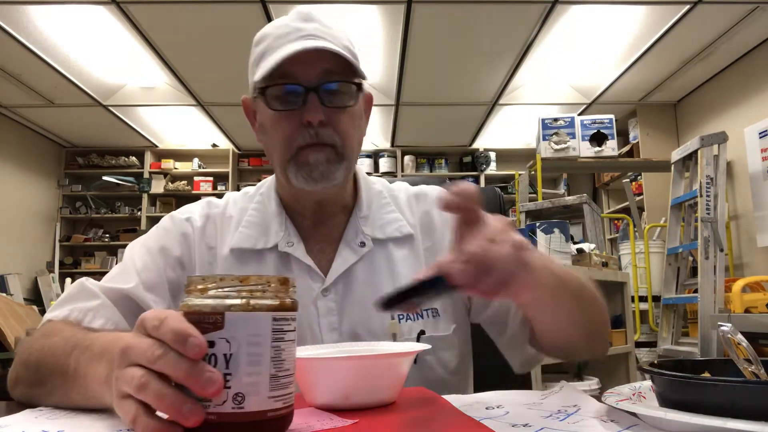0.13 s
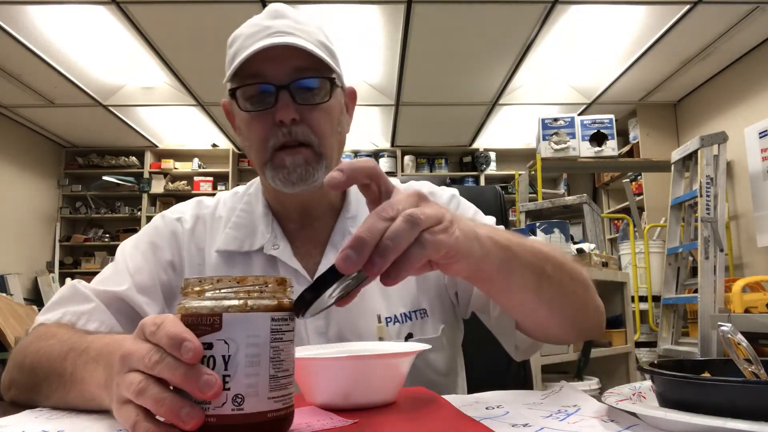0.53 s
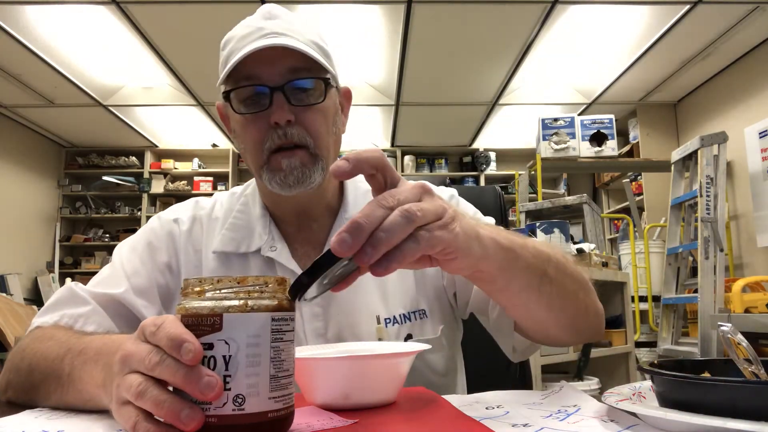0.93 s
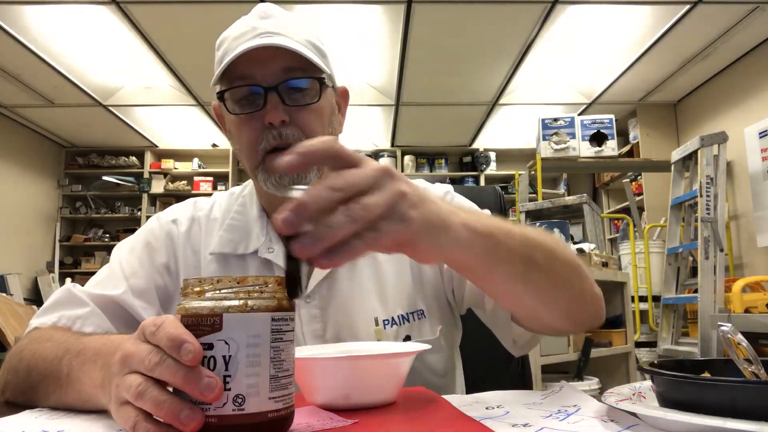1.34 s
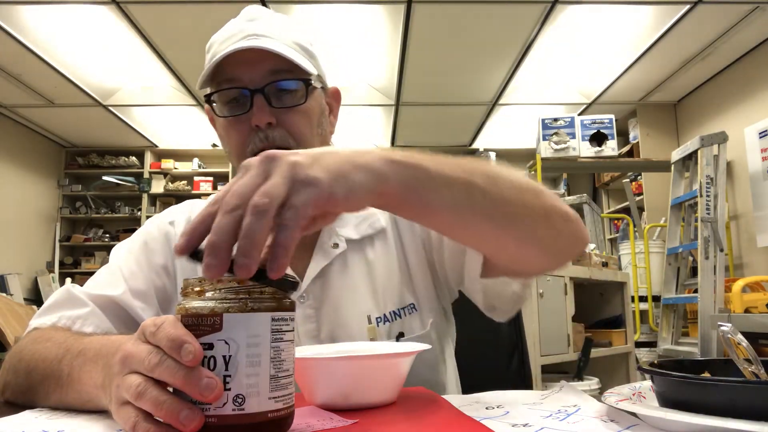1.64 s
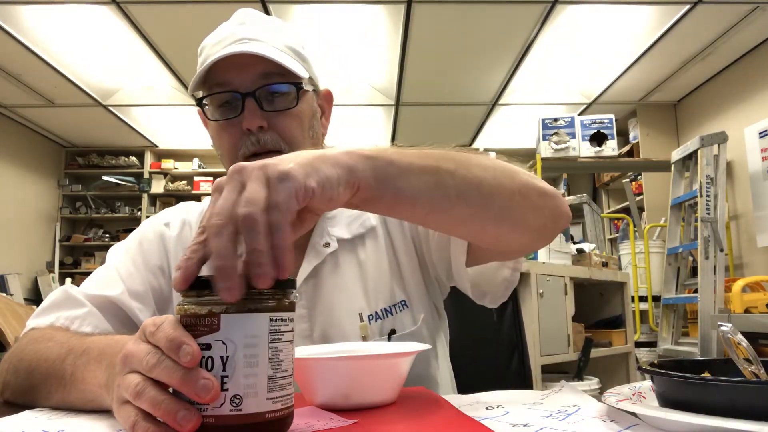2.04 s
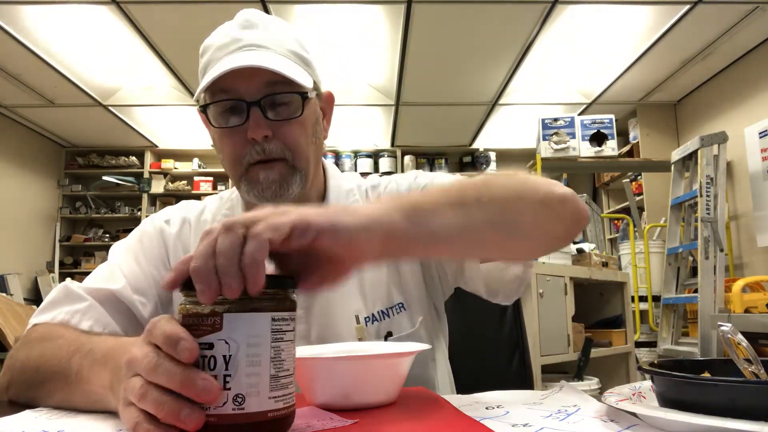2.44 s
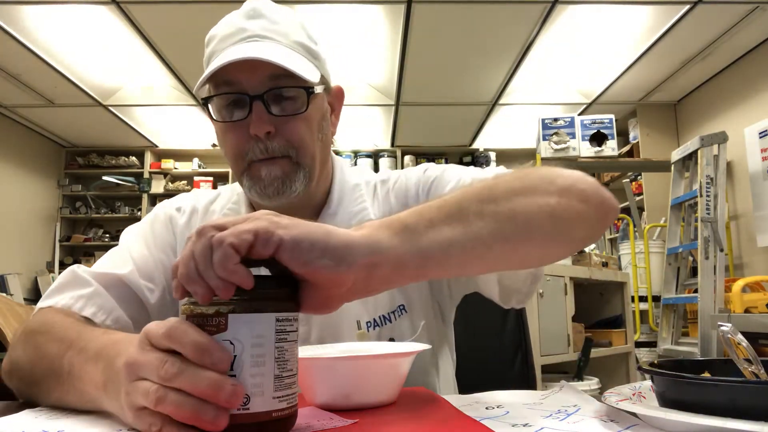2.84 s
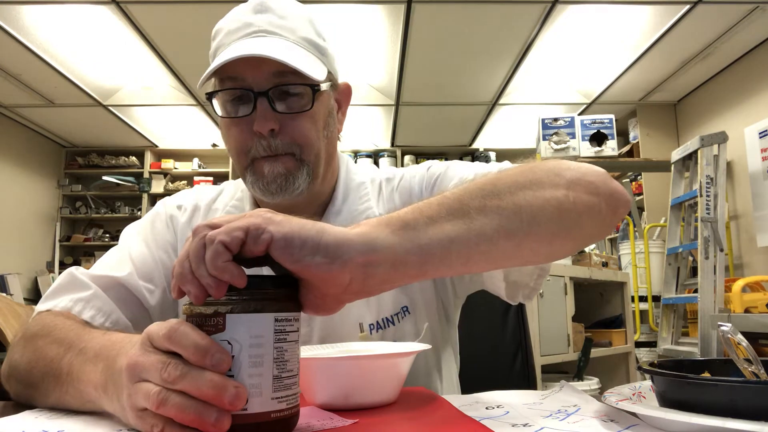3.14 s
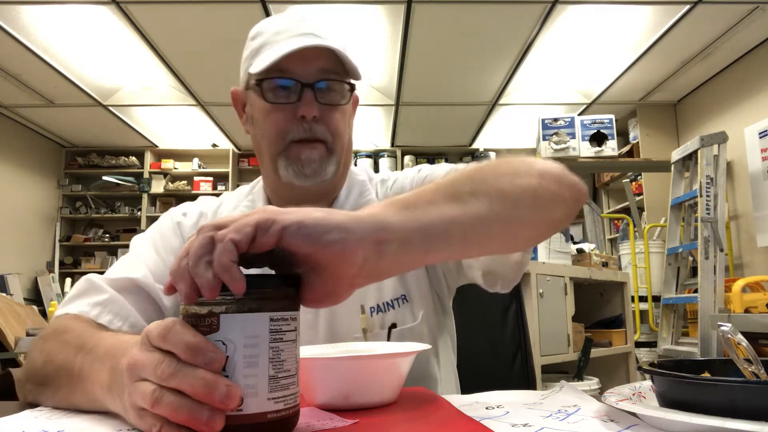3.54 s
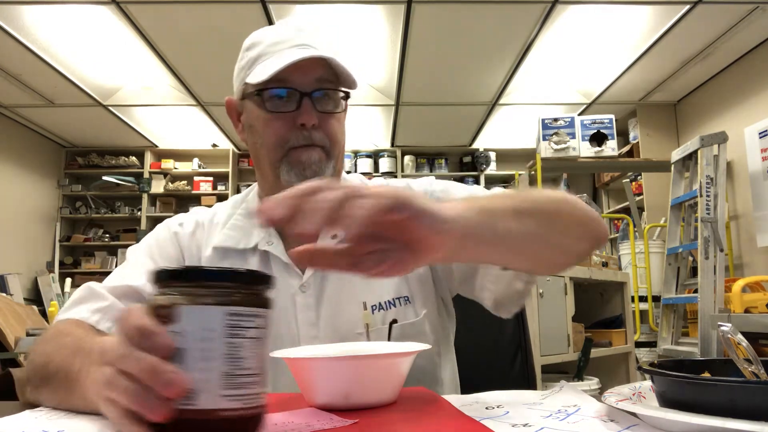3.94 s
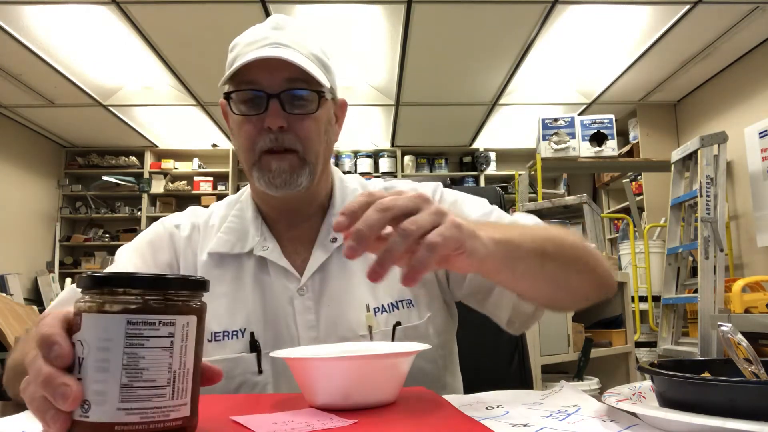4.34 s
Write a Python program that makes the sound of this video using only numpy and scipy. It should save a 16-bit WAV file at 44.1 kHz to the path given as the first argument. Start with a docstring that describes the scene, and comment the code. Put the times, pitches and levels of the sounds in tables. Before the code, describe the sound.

A metal screw lid taps twice against the rim of a glass jar, then rattles over its mouth and seats with a louder clack. Hands rub faintly as they turn the lid. The jar slides briefly across the table and the grip gives a sharp little click. It is all heard close up in a small, fairly dry room with a low ventilation rumble.

```python
"""A metal screw lid goes back on a glass jar, close by on a workshop table. Its rim taps the glass,
rattles over the mouth and clacks home: each contact cracks and rings lid, jar and the air between
them, which sounds lower as the gap closes. Hands tick and rub, turn the lid and slide the jar aside.
Ventilation rumbles and whines faintly in a small, fairly dry room."""
import sys
import numpy as np
from scipy import signal
from scipy.fft import rfft, irfft, next_fast_len
from scipy.io import wavfile
from scipy.ndimage import map_coordinates

SR = 44100
rng = np.random.default_rng(int(sys.argv[2]) if len(sys.argv) > 2 else 0)


def pcm_store(signal):
    """Save signal as 16-bit PCM."""
    levels = np.round(np.clip(np.atleast_2d(signal), -1, 1) * 32767)
    wavfile.write(sys.argv[1], SR, levels.astype(np.int16).T)


N = 198224
SCENE_T_S = np.arange(N) / SR
HIT_T_S = np.arange(SR // 3) / SR

# room decay: f/Hz, t60/s
ROOM_DECAY = [(150, 0.53), (600, 0.19), (2000, 0.27), (5000, 0.36), (9000, 0.27), (16000, 0.23)]
# background spectra: f/Hz, level/dB
DUCT_SPECTRUM = [(15, -85), (25, -104), (48, -9), (91, -10.5), (124, -3.5), (210, -8.5), (310, -18.5),
                 (425, -21), (509, -25), (574, -30.5), (730, -36.5), (900, -34), (1170, -82), (1980, -120)]
HISS_SPECTRUM = [(300, -25), (900, 7.5), (1400, 2), (2200, -2.5), (3000, -2), (4500, -2), (7500, -4.5),
                 (9000, -11), (16000, -12)]
# fan whine: f/Hz, width/Hz, level/dB, flutter/dB
WHINE_BANDS = [(3580, 87, -77.5, -1.5), (4197, 480, -74, 4.5)]

# skin, sleeve and thread strokes; rim grazes: t/s, length/s, level/dB
RUB_STROKES = [(-.05, 0.34, -65.5), (1.485, .11, -64.5), (2.425, 0.1, -69), (2.666, 0.28, -66.5),
               (3.516, 0.26, -67.5), (4.036, 0.23, -57.5), (4.197, 0.45, -64)]
RIM_GRAZES = [(1.465, 0.092, -60.5), (3.01, 0.12, -68.5)]
# friction spectra of strokes, jar on table, scraping base: f/Hz, level/dB
RUB_SPECTRUM = [(240, -33), (400, -26), (1040, -4), (1820, -1), (2120, -1), (4110, -1.5), (4650, -4),
                (12300, -14), (16000, -21)]
DRAG_SPECTRUM = [(250, 0.5), (400, -2), (520, -0.5), (660, 2), (780, -4.5), (950, -14.5), (1300, -11),
                 (3000, -18), (8000, -57)]
SCRAPE_SPECTRUM = [(700, -25), (1200, -39), (1800, -5.5), (2900, -0.5), (4200, -5), (5000, -6.5),
                   (7500, -11), (9000, -16), (16000, -23)]
# jar pushed, then lifted: t/s, speed/dB
SLIDE_SPEED = [(3.62, -17), (3.70, -12), (3.77, -4.5), (3.86, 0), (3.91, 4.5), (3.935, -9), (3.97, -14.5)]
# resonances under the sliding base: f/Hz, width/Hz
SCRAPE_BANDS = [(1500, 110), (2400, 140), (2760, 64), (3290, 100)]

# grip snaps: t/s, slip level/dB, f/Hz, slip count
GRIP_SNAPS = [(0.139, -49, 760, 1), (0.3348, -46, 6740, 1), (0.3642, -32, 4030, 3), (2.916, -54, 2530, 1),
              (3.655, -51, 2390, 1), (4.08, -54, 1860, 1), (4.234, -53.5, 2300, 1), (4.32, -50.5, 4400, 1),
              (4.378, -26.5, 4030, 4), (4.415, -48, 1430, 1)]
# slip noise: f/Hz, level/dB
FIZZ_SPECTRUM = [(300, -8), (1200, -11.5), (2000, -8), (2900, 5.5), (4200, -4), (5700, -3.5), (8000, 2.5),
                 (10500, -8), (13000, -8.5), (16000, -25)]
# ring and thud after a slip: f/Hz, level/dB, base t60/s
SNAP_MODES = [(3740, -27, 0.046), (4050, -3, 0.047), (8200, -13, 0.16)]
THUD_MODES = [(503, -4.5, 0.081), (1094, -7, 0.048), (1444, 5.5, 0.013)]

# rim on glass: t/s, strike/dB, favoured lid f/Hz, jar knock/dB, air/dB
RIM_CONTACTS = [(0.4303, -31, 2650, -37, -40.5), (0.8433, -25.5, 3400, -41, -50),
                (0.899, -53, 1700, -48.5, -71), (1.541, -44.5, 2720, -52, -47),
                (1.660, -44, 5000, -69, -42), (1.7342, -36.5, 4400, -46, -30),
                (1.7379, -32.5, 1970, -39, -24.5), (1.7534, -37.5, 2680, -37.5, -25.5),
                (1.7773, -44, 4100, -45.5, -43), (1.7992, -55, 1500, -51, -45.5),
                (1.8229, -39, 1610, -47, -42.5), (1.8481, -65, 1800, -37, -48.5),
                (1.8723, -51.5, 2220, -37, -43.5), (1.9096, -26.5, 5110, -59, -27.5),
                (1.9130, -31, 1750, -36, -22), (1.9465, -38.5, 3540, -23, -33.5),
                (1.9520, -24.5, 6300, -42, -35), (1.9585, -28, 4800, -21, -19),
                (1.9649, -20, 6360, -23.5, -27.5), (1.9672, -28, 1620, -49, -27.5),
                (2.079, -57.5, 1720, -44, -41), (2.134, -73, 1700, -47.5, -43.5),
                (2.165, -60.5, 2380, -66, -49), (2.916, -51, 800, -53, -41.5)]
# lid and standing jar: f/Hz, level/dB, base t60/s
LID_MODES = [(1493, -18.5, 0.1), (1649, 1, 0.062), (1820, -54, .045), (1850, -1.5, 0.03), (2237, -17, 0.13),
             (2445, -12.5, 0.098), (2850, -10, 0.027), (3158, -19.5, 0.14), (3710, -15, 0.086),
             (4620, -5, 0.079), (4647, -4.5, 0.04), (5070, -18, 0.1), (6066, -18, 0.089),
             (6450, -18, 0.048), (7860, -9, 0.054), (9980, -16, 0.068), (12800, -16, 0.08)]
JAR_MODES = [(325, -12, 0.078), (437, -8, 0.061), (501, 4, 0.036), (552, 0.5, 0.043), (618, -3, 0.073),
             (687, -10, 0.1), (877, -17, 0.092)]
# contact noise before tilt: f/Hz, level/dB
CRACK_SPECTRUM = [(200, 0), (850, -8), (1250, 4), (1700, 3), (3200, -6.5), (4100, -2.5), (4800, 1),
                  (6400, -1.5), (7700, -15), (9200, -27.5), (10500, -20), (15500, -19)]
# air resonance under the lid: t/s, f/Hz
GAP_PITCH = [(1.54, 955), (1.66, 1175), (1.734, 1040), (1.738, 942), (1.91, 890), (1.913, 570),
             (1.955, 640), (1.968, 480), (2.15, 585), (2.916, 311)]
# closing fingers damp the lid: t/s, t60 factor
GRIP_DAMPING = [(.43, 1.08), (.84, 0.79), (1.66, 0.43), (1.95, 0.43)]

RING_ATTACK_S, MID_HZ = 0.0007, 3000


def amp(db):
    """dB to gain."""
    return 10 ** (np.asarray(db) / 20)


def unit(x):
    """Scale to rms 1."""
    return x / np.sqrt(np.mean(x ** 2) + 1e-20)


def at_hz(points, hz):
    """Interpolate on a log frequency axis."""
    knots_hz, values = np.transpose(points)
    return np.interp(np.log(hz + 1), np.log(knots_hz + 1), values)


def peak(hz, centre_hz, width_hz):
    """Gain of one resonance."""
    return 1 / (1 + (2 * (hz - centre_hz) / width_hz) ** 2)


def filtered(x, response):
    """Apply a frequency response."""
    size = next_fast_len(len(x) + SR // 4)
    return irfft(rfft(x, size) * response(np.fft.rfftfreq(size, 1 / SR)), size)[:len(x)]


def noise(spectrum, size=N):
    """Coloured noise, rms 1."""
    return unit(filtered(rng.standard_normal(size), lambda hz: amp(at_hz(spectrum, hz))))


def noise_band(centre_hz, width_hz):
    """Noise through one resonance."""
    return filtered(rng.standard_normal(N), lambda hz: peak(hz, centre_hz, width_hz))


def wobble(rate_hz):
    """Smooth random curve."""
    return map_coordinates(rng.standard_normal(int(N * rate_hz / SR) + 4), [SCENE_T_S * rate_hz])


def fade(t60_s, attack_s):
    """Quick rise, exponential decay."""
    return np.exp(-np.log(1000) * HIT_T_S / t60_s) * (1 - np.exp(-HIT_T_S / attack_s))


def ping(hz, t60_s, attack_s=RING_ATTACK_S):
    """One damped mode."""
    return fade(t60_s, attack_s) * np.sin(2 * np.pi * hz * HIT_T_S)


def ring(modes, t60_factor, scatter_db, attack_s=RING_ATTACK_S):
    """Modes of alternating sign, levels scattered per hit."""
    return sum((-1) ** k * amp(db + scatter_db * rng.normal()) * ping(hz, t60_s * t60_factor, attack_s)
               for k, (hz, db, t60_s) in enumerate(modes))


def stroke_gain(strokes):
    """Each stroke speeds up, then slows to rest."""
    return sum(amp(db) * np.interp((SCENE_T_S - start_s) / length_s, [0, 0.35, 1], [0, 1, 0])
               for start_s, length_s, db in strokes)


def add(track, t_s, sound):
    """Mix in at t_s."""
    rest = track[round(t_s * SR):][:len(sound)]
    rest += sound[:len(rest)]


def background():
    """Duct rumble, mains hum, fluttering fan whine, even hiss."""
    rumble = amp(-57.5) * noise(DUCT_SPECTRUM)
    hum = amp(-64.5 + 0.61 * wobble(4.4)) * np.sin(2 * np.pi * 120 * SCENE_T_S)
    whine = sum(amp(db) * unit(noise_band(hz, width_hz) * amp(flutter_db * np.tanh(2 * wobble(55))))
                for hz, width_hz, db, flutter_db in WHINE_BANDS)
    hiss = amp(-72.5) * noise(HISS_SPECTRUM)
    return rumble + hum + whine + hiss


def room(x, early_db, tail_db, echo_db, echo_s):
    """Early scatter off table and body, short tail off shelves, far-wall echo."""
    hz, t_s, bins = signal.stft(rng.standard_normal(SR // 2), SR, nperseg=256)
    decay = np.exp(-np.log(1000) * t_s / at_hz(ROOM_DECAY, hz)[:, None])
    tail = signal.istft(bins * decay, SR, nperseg=256)[1]
    response = amp(tail_db) * tail / np.linalg.norm(tail)
    scatter = rng.standard_normal(len(HIT_T_S)) * fade(t60_s=0.082, attack_s=0.00031)
    scatter /= np.linalg.norm(scatter)
    add(response, 0, amp(early_db) * scatter)
    add(response, echo_s, amp(echo_db) * scatter)
    return signal.fftconvolve(x, response)[:N]


def table_boom():
    """Knocks pass through the jar into the table top."""
    out = np.zeros(N)
    for t_s, _, _, knock_db, _ in RIM_CONTACTS:
        add(out, t_s, amp(knock_db - 34) * ping(hz=71, t60_s=0.6, attack_s=0.005))
    return out


def rubbing():
    """Grainy stick-slip: skin, sleeve, thread, turning palm, grazing rim."""
    palm_gain = amp(-71) * np.interp(SCENE_T_S, [2.1, 2.575, 3.05], [0, 1, 0])
    grain = amp(3.4 * wobble(29.9) + 1.6 * wobble(420))
    graze = stroke_gain(RIM_GRAZES) * unit(grain * noise_band(centre_hz=1500, width_hz=330))
    rub = (stroke_gain(RUB_STROKES) + palm_gain) * unit(grain * noise(RUB_SPECTRUM))
    return rub + graze


def jar_slide():
    """The base drags over the mat: a hollow rub, brighter with speed."""
    speed_db = np.interp(SCENE_T_S, *np.transpose(SLIDE_SPEED))
    stick_slip = amp(2.5 * wobble(160))
    drag = amp(-53.5 + speed_db) * unit(stick_slip * noise(DRAG_SPECTRUM))
    hollow = filtered(noise(SCRAPE_SPECTRUM),
                      lambda hz: 1 + amp(5.5) * sum(peak(hz, *band) for band in SCRAPE_BANDS))
    scrape = amp(-63 + 1.46 * speed_db) * unit(stick_slip * hollow)
    return drag + scrape


def grip_snaps(gap_s=0.0026, jitter_s=0.00015, spread_oct=0.13, scatter_db=1.5):
    """Gripping hands snap in tiny slips, single or in tight runs."""
    out = np.zeros(N)
    for t_s, db, hz, count in GRIP_SNAPS:
        for k in range(round(count)):
            slip_hz = hz * 2 ** (spread_oct * rng.normal())
            tick = amp(3.5) * ping(slip_hz, t60_s=0.011, attack_s=0.000088)
            fizz = amp(-3.5) * noise(FIZZ_SPECTRUM, len(HIT_T_S)) * fade(t60_s=0.017, attack_s=0.00058)
            ringing = amp(-23) * ring(SNAP_MODES, t60_factor=1, scatter_db=0)
            thud = amp(-19) * ring(THUD_MODES, t60_factor=0.89, scatter_db=1.5)
            slip_s = t_s + k * gap_s + jitter_s * rng.normal()
            add(out, slip_s, amp(db + scatter_db * rng.normal()) * (tick + fizz + ringing + thud))
    return out


def rim_crack(strike_db, favoured_hz, looseness, firm_db=-25):
    """Contact noise: brighter when harder, sharper or looser."""
    tilt_db_per_oct = -3 + 0.05 * (strike_db - firm_db)
    tilt_db_per_oct += 1.26 * np.log2(favoured_hz / MID_HZ) + 7 * looseness
    spectrum = [(hz, db + tilt_db_per_oct * np.log2(hz)) for hz, db in CRACK_SPECTRUM]
    return amp(strike_db) * noise(spectrum, len(HIT_T_S)) * fade(t60_s=0.022, attack_s=0.000043)


def struck_lid_modes(favoured_hz, boost_db=11.5, width_oct=0.17, damping_hz=11100):
    """The strike point favours some modes; fingers detune and damp the high ones most."""
    modes = []
    for hz, db, t60_s in LID_MODES:
        detuned_hz = hz * (1 + 0.008 * hz / MID_HZ * rng.normal())
        favour = np.exp(-(np.log2(hz / favoured_hz) / width_oct) ** 2)
        modes.append((detuned_hz, db + boost_db * favour, t60_s / (1 + (hz / damping_hz) ** 2)))
    return modes


def lid_on_jar():
    """Each contact cracks, rings the lid, knocks the jar and sounds the air in its mouth."""
    out = np.zeros(N)
    for t_s, strike_db, favoured_hz, knock_db, air_db in RIM_CONTACTS:
        looseness = np.interp(t_s, *np.transpose(GRIP_DAMPING))
        air_hz = np.interp(t_s, *np.transpose(GAP_PITCH))
        metal = amp(strike_db - 2.5) * ring(struck_lid_modes(favoured_hz), looseness, scatter_db=4)
        crack = rim_crack(strike_db, favoured_hz, looseness)
        # heavy jar: slower rise, damped by the pressing lid
        glass = amp(knock_db) * ring(JAR_MODES, t60_factor=1.14 * np.sqrt(looseness),
                                     scatter_db=3, attack_s=2 * RING_ATTACK_S)
        air = amp(air_db) * ping(air_hz, t60_s=0.066)
        add(out, t_s, metal + crack + glass + air)
    return out


def scene():
    """Close handling, room and background; mono."""
    bass_cut = signal.butter(2, 230, "highpass", fs=SR, output="sos")  # small bodies radiate little bass
    near = signal.sosfilt(bass_cut, lid_on_jar() + grip_snaps() + jar_slide()) + table_boom() + rubbing()
    reflections = room(near, early_db=-13.5, tail_db=-14.5, echo_db=-35.5, echo_s=0.076)
    return (near + reflections + background())[None]


def record(dry):
    """Steep low-pass."""
    top_hz = 16100
    return np.array([filtered(channel, lambda hz: 1 / (1 + (hz / top_hz) ** 160)) for channel in dry])


dry = scene()
out = record(dry)
pcm_store(out)
```